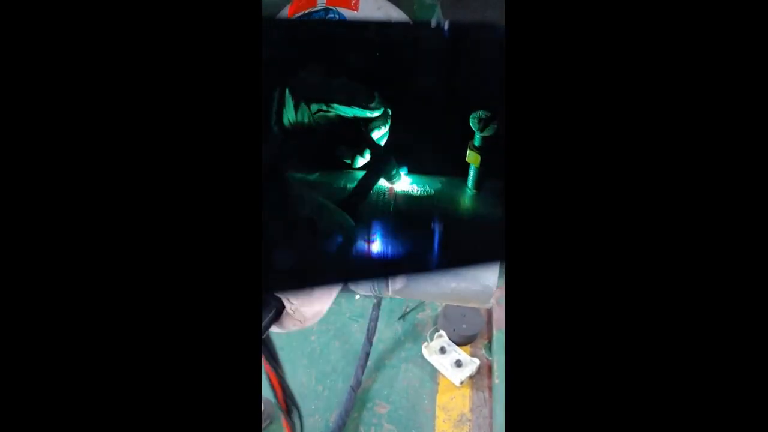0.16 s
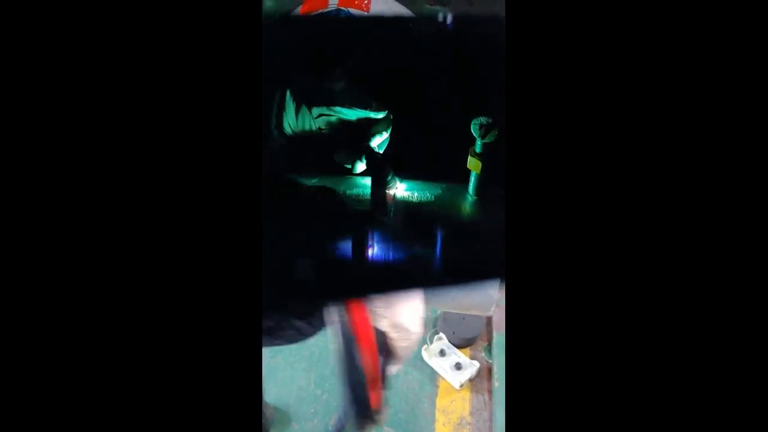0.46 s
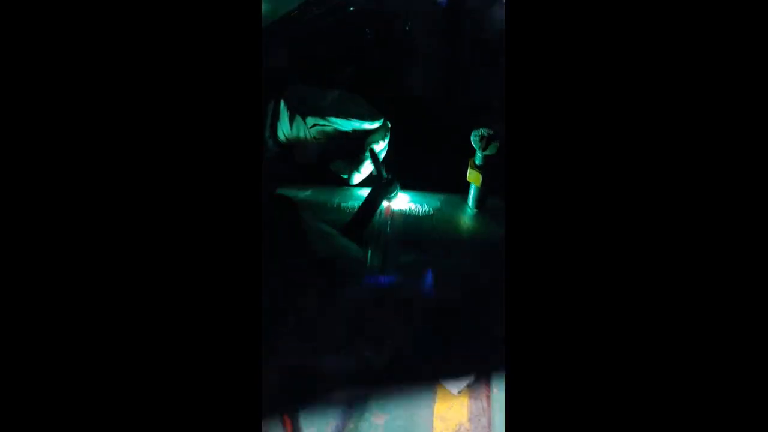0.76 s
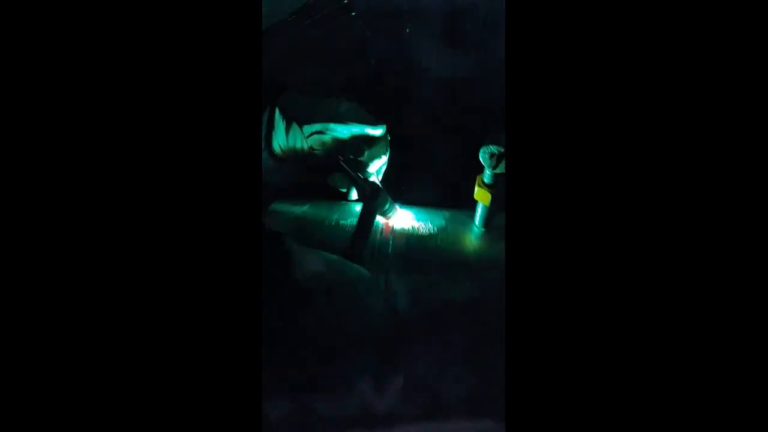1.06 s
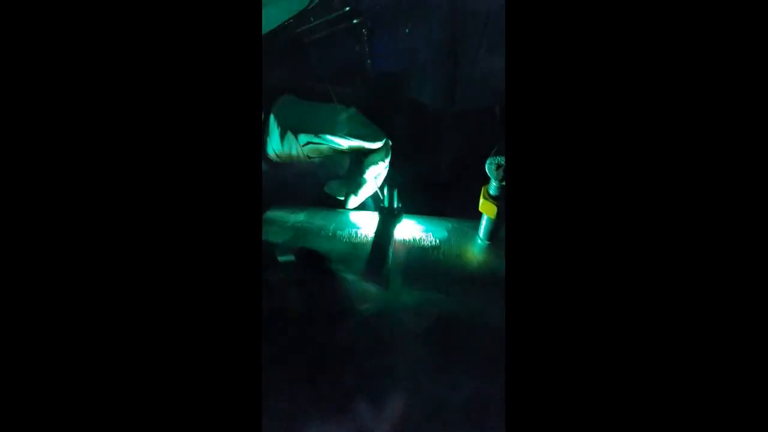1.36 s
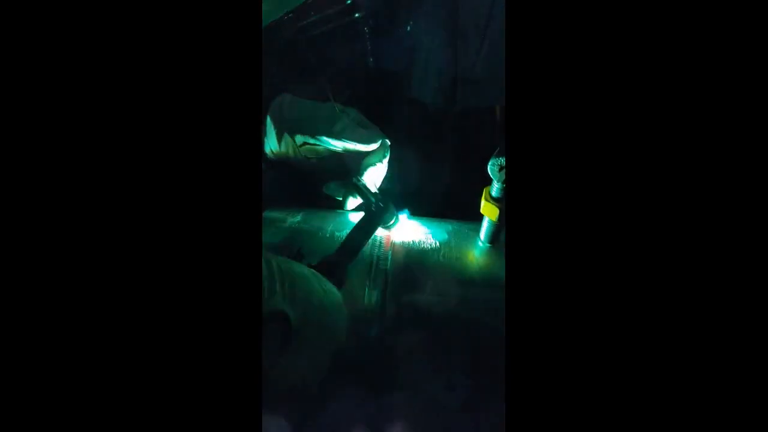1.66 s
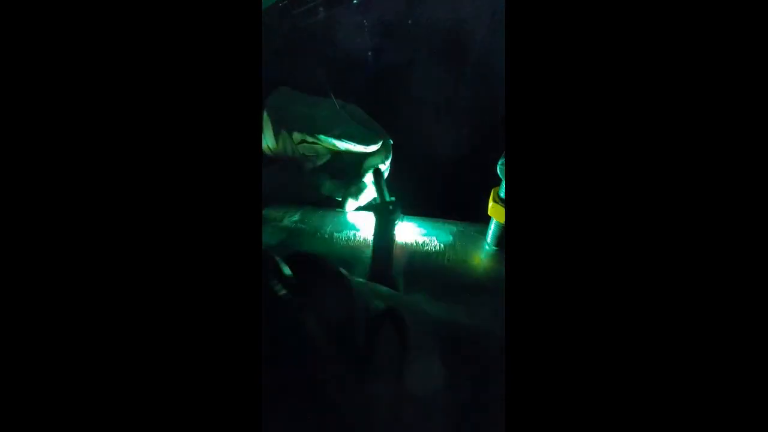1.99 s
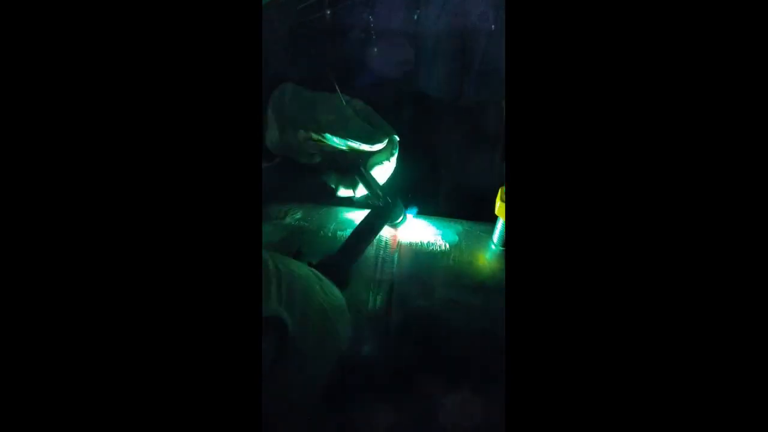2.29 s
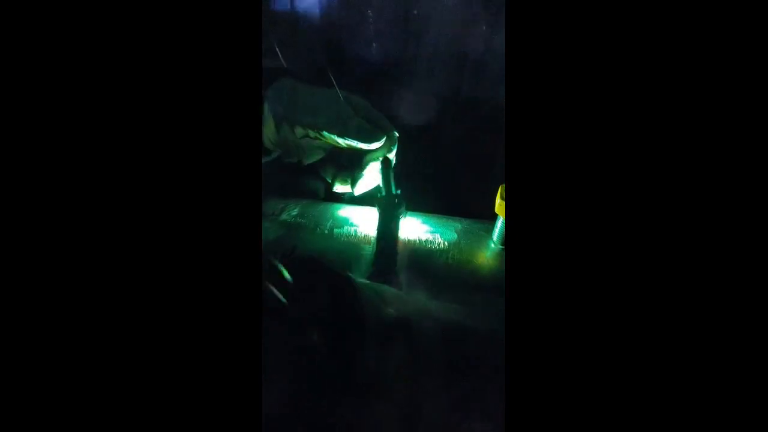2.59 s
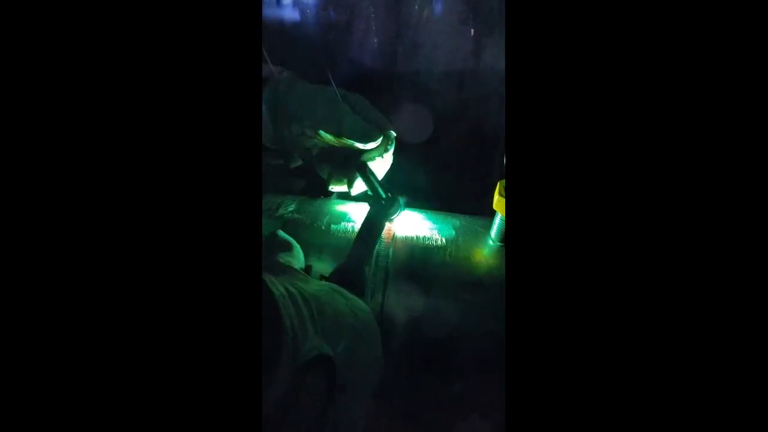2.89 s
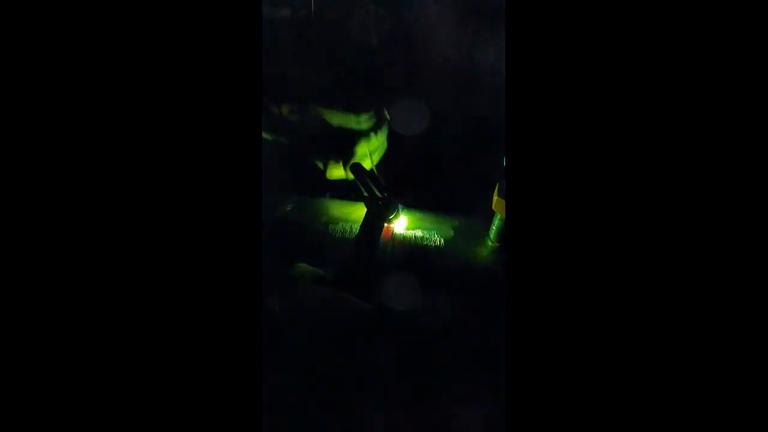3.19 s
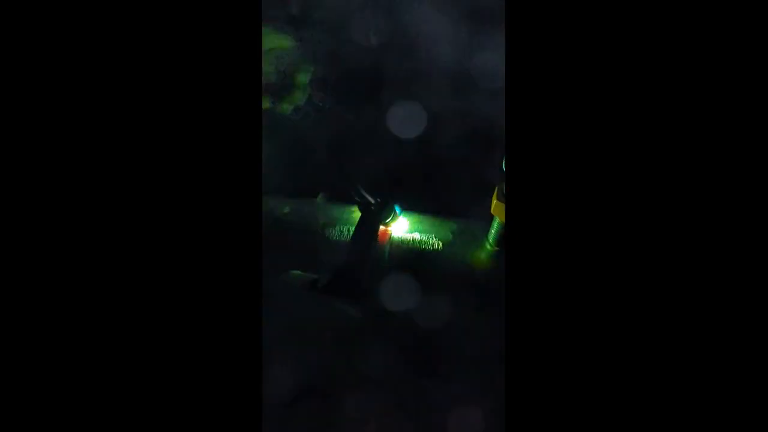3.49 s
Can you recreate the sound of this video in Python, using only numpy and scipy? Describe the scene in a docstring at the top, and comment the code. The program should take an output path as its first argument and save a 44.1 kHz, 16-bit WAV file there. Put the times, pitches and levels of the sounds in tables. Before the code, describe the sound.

A welding arc buzzes steadily and harshly on a metal pipe, turning thinner near the end.

```python
"""An alternating-current arc welds an aluminium pipe in a workshop, heard close by from behind a welding mask.
From the start every cycle reverses the current in a few sharp pressure steps, and the arc crackles and rings as
it relights; filtered impulses make the steps, decaying noise the crackle. One louder spit comes at about 1.9 s.
From about 3.16 s the current is eased off and the buzz turns thinner. Throughout, shaped noise makes the gas
hiss and the machine's fan rumble, and the workshop answers the arc with decaying noise tails."""
import sys
import numpy as np
from scipy import signal
from scipy.fft import rfft, irfft, next_fast_len
from scipy.io import wavfile
from scipy.ndimage import uniform_filter1d, map_coordinates

SR = 44100
rng = np.random.default_rng(int(sys.argv[2]) if len(sys.argv) > 2 else 0)


def nominal_scale(level):
    """Amplitude ratio for a level in decibels (scalar or array-like)."""
    x = np.asarray(level, float) / 20
    return 10 ** x


def bounce(signal):
    """Save signal as a 16-bit WAV file at the path given by the first command-line argument."""
    frames = np.transpose(np.atleast_2d(signal))
    limited = np.clip(frames, -1, 1)
    pcm = np.round(limited * 32767).astype(np.int16)
    wavfile.write(sys.argv[1], SR, pcm)


N = 160965

CYCLE_HZ, FIRST_CYCLE_S = 56.722, .012
# relighting after the start of the cycle, and the crackle's bounce after the relighting
RELIGHT_MS, CRACKLE_ECHO_MS = 2.55, 1.7


def unit(x):
    """Power normalisation: scales a signal to rms 1."""
    return x / np.sqrt(np.mean(x ** 2) + 1e-20)


def along(points, hz):
    """Spectral interpolation: reads (frequency, value) points on a log frequency axis."""
    f, v = np.transpose(points)
    return np.interp(np.log(hz + 1), np.log(f + 1), v)


def curves(rows, t):
    """Linear interpolation in time: reads each column after the first at times t."""
    s, *cols = np.transpose(rows)
    return [np.interp(t, s, c) for c in cols]


def wobble(rate):
    """Slow random modulation: a smooth curve through rate random knots a second."""
    knots = rng.standard_normal(int(N * rate / SR) + 4)
    return map_coordinates(knots, [np.arange(N) * rate / SR])


def filtered(x, response):
    """Linear filtering: multiplies the spectrum by a complex response of frequency."""
    m = next_fast_len(N + SR // 2)
    return irfft(rfft(x, m) * response(np.fft.rfftfreq(m, 1 / SR)), m)[..., :N]


def pulses(s, size):
    """Band-limited impulses: windowed sincs centred at times between samples."""
    at = s.ravel()[:, None] * SR
    i = np.floor(at).astype(int) + np.arange(-7, 9)
    window = np.cos((i - at) * np.pi / 16) ** 2
    shape = size.ravel()[:, None] * np.sinc(i - at) * window
    inside = (i >= 0) & (i < N)
    return np.bincount(i[inside], shape[inside], N)


def arc():
    """Periodic excitation by current reversal: steps, ring, crackle and a spit, direct and through the shop."""
    # pressure steps within one cycle: after_cycle_start_ms, relative_size
    steps_full = [(1.85, -.5), (2.55, 1)]
    steps_eased = [(2, .25), (2.45, -1)]
    # easing off of the current: time_s, share_of_eased_steps
    ease_off = [(0, 0), (3.162, 0), (3.185, .6), (3.225, 1), (3.65, 1)]
    # buzz of the full steps, used about its mean: time_s, relative_level_db
    buzz = [(0.03, -15), (1.2, -15.5), (1.44, -14), (1.9, -14.5), (2.22, -13), (2.51, -15), (3.13, -14.5)]
    # buzz of the eased steps: time_s, relative_level_db
    rasp = [(3.2, 1.5), (3.35, 0.5), (3.45, 1.5), (3.55, 1.5), (3.65, 0.5)]
    # colour of the steps inside the mask: frequency_hz, gain_db
    tone_full = [(60, -34.5), (170, -5), (230, 1.5), (285, 0), (340, 6), (400, 3), (480, -0.5), (620, 5),
                 (740, 2), (800, 5.5), (860, -3.5), (1000, -9), (1400, -15.5), (1750, -4), (1900, -3.5),
                 (2050, -1.5), (2180, -3), (2300, -5.5), (2550, -5), (2800, -2), (3000, -14.5),
                 (3300, -8.5), (3700, -29), (4200, -6), (4800, -46), (5400, -16.5), (7000, -30),
                 (10000, -27.5), (16000, -43)]
    tone_eased = [(60, -24), (170, -15), (400, 1), (600, 2.5), (720, -7.5), (850, -13), (960, 1.5),
                  (1100, -2), (1300, -3.5), (1600, -6.5), (1900, -4.5), (2100, -11), (2300, 1), (2800, -3),
                  (3200, -18), (4200, -9), (6000, -14.5), (16000, -22)]
    # stereo balance of the steps: frequency_hz, left_over_right_db
    lean_full = [(60, 0.0), (99, 0.0), (160, -3), (270, 15), (450, 1), (740, -2.5), (1220, -7), (2010, 9),
                 (3330, -2.5), (5500, 11), (9080, 10), (15000, 4)]
    lean_eased = [(60, 1.0), (99, 5), (160, -7), (270, 2), (450, 2), (740, -4), (1220, -1.5), (2010, 11.5),
                  (3330, -8.5), (5500, 9), (9080, 2), (15000, 7)]
    # strength of the relighting crackle: time_s, relative_level_db
    crackle_levels = [(0.0, -33.5), (0.86, -35), (1.15, -29.5), (1.23, -40), (1.75, -27.5), (2.1, -43.5),
                      (2.11, -32), (2.14, -28.5), (2.6, -30.5), (2.65, -43), (2.71, -30.5), (3.16, -32),
                      (3.17, -20), (3.21, -34), (3.51, -35.5), (3.65, -30)]
    # colour of the crackle, overall level set apart: frequency_hz, relative_gain_db
    crackle_tone = [(200, -35), (900, -2.5), (2000, 4), (3500, -7), (5500, -2.5), (7000, -14), (8500, -33),
                    (10200, -4.5), (12000, -14.5), (14000, -15.5), (16000, -23)]
    # louder spits: start_s, level_db
    spits = [(1.8828, -9.5)]
    # colour of the spit, overall level set apart: frequency_hz, relative_gain_db
    spit_tone = [(500, -25), (1200, 3), (2600, 2), (5000, -12), (12000, -17)]
    crackle_gain_db, scatter_db, echo_db, crackle_t60_s = 16, 2.5, 0.5, .0055
    shop_gain_db, shop_low_hz = -16, 500

    start = FIRST_CYCLE_S + np.arange(-1, int(N / SR * CYCLE_HZ) + 1) / CYCLE_HZ
    eased, = curves(ease_off, start)
    buzz_db, = curves(buzz, start)
    rasp_db, = curves(rasp, start)
    full_size = (1 - eased) * nominal_scale(buzz_db - buzz_db.mean())
    full, full_near = steps(start, steps_full, full_size, tone_full, lean_full)
    thin, thin_near = steps(start, steps_eased, eased * nominal_scale(rasp_db), tone_eased, lean_eased)

    # each relighting crackles twice: at once and by its bounce
    crackle_db = curves(crackle_levels, start)[0] + crackle_gain_db
    crackle_db = crackle_db + scatter_db * rng.standard_normal(len(start))
    relight = start[:, None] + (RELIGHT_MS + np.array([0, CRACKLE_ECHO_MS])) / 1000
    crackle = burst(crackle_tone, relight, nominal_scale(crackle_db[:, None] + [0, echo_db]), crackle_t60_s)
    spit_s, spit_db = np.transpose(spits)
    noisy = crackle + burst(spit_tone, spit_s, nominal_scale(spit_db), t60=0.024)

    # the mask keeps the shop's bass out
    send = filtered(2 * (full + thin) + noisy.mean(axis=0), lambda hz: hz / np.hypot(hz, shop_low_hz))
    near = full_near + thin_near + ring(start) + noisy
    return near + nominal_scale(shop_gain_db) * shop(send)


def steps(start, rows, size, tone, lean):
    """Source-filter principle: jittered impulses, coloured; returns them at the arc and at both microphones."""
    jitter_ms, scatter_db, gain_db = .008, .7, 15.5  # jitter and scatter are standard deviations
    ms, height = np.transpose(rows)
    chance = rng.standard_normal((len(start), 4))
    at = start[:, None] + (ms + jitter_ms * chance[:, :2]) / 1000
    heights = size[:, None] * height * nominal_scale(gain_db + scatter_db * chance[:, 2:])
    x = filtered(pulses(at, heights), causal(tone))
    return x, filtered(x, lambda hz: ways(hz) * nominal_scale(np.outer([.5, -.5], along(lean, hz))))


def causal(tone):
    """Minimum phase by the folded cepstrum: a colour whose ringing follows the blow."""
    def response(hz):
        c = irfft(np.log(nominal_scale(along(tone, hz))))
        c[1:len(hz) - 1] *= 2
        c[len(hz):] = 0
        return np.exp(rfft(c))
    return response


def ways(hz):
    """Multipath interference: summed delayed copies give the response at each of the two microphones."""
    # direct way and ways by pipe, bench and mask: delay_ms, relative_size
    ways_left = [(0, 1), (1.7, 2), (3.1, .7), (8.3, .2)]
    ways_right = [(.1, .9), (1.8, 2), (3.25, .9), (8.5, .3)]
    return np.array([sum(g * np.exp(-2j * np.pi * hz * ms / 1000) for ms, g in side)
                     for side in (ways_left, ways_right)])


def ring(start):
    """Damped resonance: each relighting strikes a short upper ring."""
    # strength of the ring: time_s, relative_level_db
    ring_levels = [(0, -21), (1.2, -14), (1.9, 20), (2.6, 14.5), (3.15, 18), (3.25, 3), (3.65, -10)]
    centre_hz, width_hz, gain_db = 2685, 260, -1
    level_db, = curves(ring_levels, start)
    x = pulses(start + RELIGHT_MS / 1000, nominal_scale(gain_db + level_db))

    def resonance(f):
        return 1j * f * width_hz / (centre_hz ** 2 - f * f + 1j * f * width_hz)
    return filtered(x, lambda f: ways(f) * resonance(f))


def burst(tone, starts_s, size, t60):
    """Exponential decay: stereo noise, partly each side's own, that starts at once and dies away."""
    own_share = 0.55  # of the noise power
    t = np.arange(SR // 50) / SR
    gate = signal.fftconvolve(pulses(starts_s, size), nominal_scale(-60 * t / t60))[:N]
    shared, *own = rng.standard_normal((3, N))
    noise = np.sqrt(1 - own_share) * shared + np.sqrt(own_share) * np.array(own)
    return gate * unit(filtered(noise, lambda hz: nominal_scale(along(tone, hz))))


def gas():
    """Turbulent jet noise: shielding gas hisses, swelling as the arc relights."""
    # hiss strength and balance: time_s, relative_level_db, left_over_right_db
    hiss = [(0.0, -28.5, -2), (0.15, -38.5, -7), (0.53, -31.5, 2), (0.86, -44, -5), (1.15, -28, 1),
            (1.4, -32.5, 1), (1.8, -29, -3), (1.98, -30.5, 2), (2.46, -29, -6), (2.57, -31.5, 7),
            (2.87, -27.5, -2), (2.88, -34, 0), (3.13, -32, 0), (3.24, -25, -9), (3.25, -30, -2),
            (3.38, -27.5, -4), (3.63, -27, 0), (3.65, -35, -2)]
    # colour of the hiss, overall level set apart: frequency_hz, relative_gain_db
    hiss_tone = [(2500, 3), (5000, -15), (7500, -5.5), (9000, -3.5), (10000, 2.5), (11200, -10),
                 (13000, -18.5), (15500, -29)]
    gain_db, swell_peak_db, swell_sharpness = 0.5, 9, 12
    t = np.arange(N) / SR
    level_db, pan_db = curves(hiss, t)
    # the swell peaks midway between relighting and bounce
    peak_s = FIRST_CYCLE_S + (RELIGHT_MS + CRACKLE_ECHO_MS / 2) / 1000
    swell_db = swell_peak_db * np.abs(np.cos(np.pi * CYCLE_HZ * (t - peak_s))) ** swell_sharpness
    sides_db = np.array([pan_db, -pan_db]) / 2
    return nominal_scale(gain_db + level_db + swell_db + sides_db) * rush(hiss_tone, [(5000, .1)], patchy_db=.8)


def fan():
    """Broadband flow noise with narrow-band blade tones: a rumble with two unsteady tones."""
    # colour of the rumble, overall level set apart: frequency_hz, relative_gain_db
    fan_tone = [(20, -11.5), (60, -15), (90, -7), (125, -10), (175, -2.5), (230, -2.5), (300, -1.5),
                (400, -3.5), (600, -7), (1200, -11.5), (2200, -13), (4000, -17), (8000, -24.5),
                (16000, -24)]
    # likeness of the two sides: frequency_hz, correlation
    fan_alike = [(60, 0.99), (130, 1), (300, 0.98), (700, 1), (1400, 0.33), (4000, 0.95), (12000, 0)]
    # blade tones: frequency_hz, half_width_hz (at -6 dB), rms_level_db
    fan_lines = [(82.4, 18, -46), (172.5, 2, -38.5)]
    blades = np.zeros(N)
    for hz, w, db in fan_lines:
        tone = filtered(rng.standard_normal(N), lambda f: 1 / (1 + ((f - hz) / w) ** 2))
        blades += nominal_scale(db) * unit(tone)
    return nominal_scale(-24 + 0.17 * wobble(2.6)) * rush(fan_tone, fan_alike, patchy_db=1.75) + blades


def rush(tone, alike, patchy_db):
    """Partial coherence: stereo noise of rms 1 with patches of random gain in time and frequency."""
    z = signal.stft(rng.standard_normal((2, N)), nperseg=512)[2]
    field = uniform_filter1d(rng.standard_normal(z.shape[1:]), size=6, axis=0)
    field = uniform_filter1d(field, size=12, axis=1)
    pair = signal.istft(z * nominal_scale(patchy_db * unit(field)), nperseg=512)[1][:, :N]

    def mid_side(hz):
        # this mid/side angle gives the wanted correlation
        turn = np.arccos(np.clip(along(alike, hz), -1, 1)) / 2
        return nominal_scale(along(tone, hz)) * np.array([np.cos(turn), np.sin(turn)])
    mid, side = filtered(pair, mid_side)
    return unit(np.array([mid + side, mid - side]))


def shop(x):
    """Reverberation by decaying noise tails: the workshop's answer, slowly changing as the listener moves."""
    # decay of the workshop: frequency_hz, t60_s
    decay = [(200, 0.9), (1000, 0.35), (4000, 0.18), (12000, 0.027)]
    drift_s = .6  # from one tail to the next
    out, where = np.zeros((2, N)), np.arange(N) / SR / drift_s
    for k in range(int(where[-1]) + 2):
        hz, t, z = signal.stft(rng.standard_normal((2, SR // 3)), SR, nperseg=256)
        tail = signal.istft(z * nominal_scale(-60 * t / along(decay, hz)[:, None]), SR, nperseg=256)[1]
        tail = tail / np.linalg.norm(tail[0])
        part = x * np.cos(np.clip(where - k, -1, 1) * np.pi / 2)  # constant-power crossfade
        delayed = np.pad(part, (150, 0))[None]  # samples
        out += signal.oaconvolve(delayed, tail, axes=1)[:, :N]
    return out


def scene():
    """Linear superposition: arc over gas and fan."""
    return arc() + gas() + fan()


def top_cut(x):
    """Nothing passes above the cut-off."""
    return signal.sosfilt(signal.butter(12, 16880, fs=SR, output="sos"), x)


def record(dry):
    """Saturation and band limiting: the input rounds off the tallest peaks and keeps nothing above its band."""
    hardness, ceiling, top_hz = 6, .97, 15900
    clipped = dry / (1 + np.abs(dry / ceiling) ** hardness) ** (1 / hardness)
    mix = filtered(clipped, lambda hz: hz < top_hz)
    return top_cut(mix)


dry = scene()
out = record(dry)
bounce(out)
```